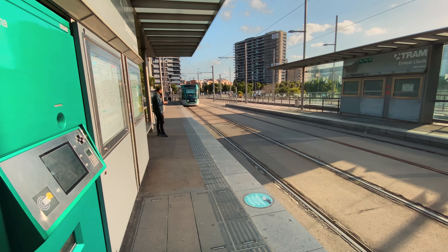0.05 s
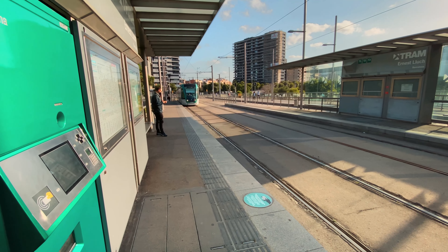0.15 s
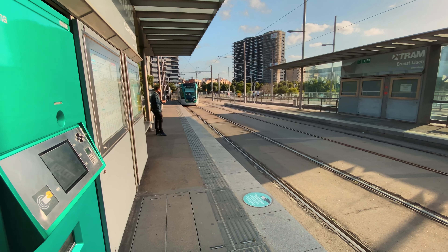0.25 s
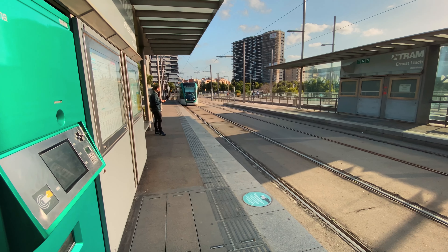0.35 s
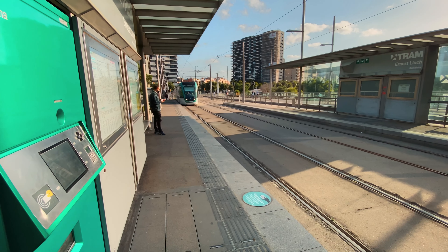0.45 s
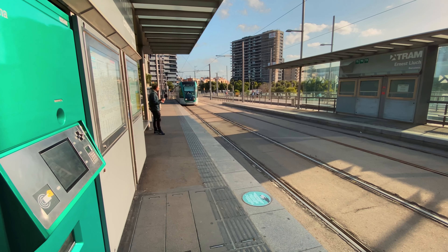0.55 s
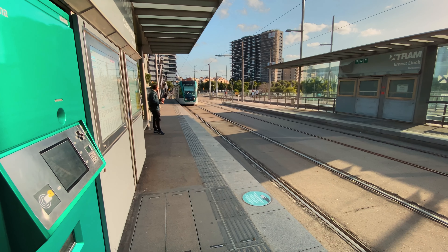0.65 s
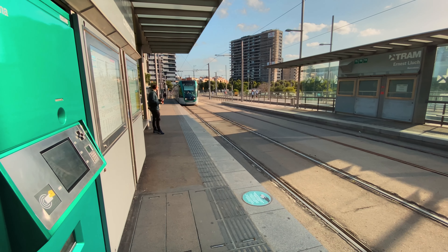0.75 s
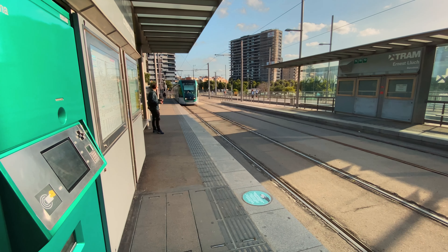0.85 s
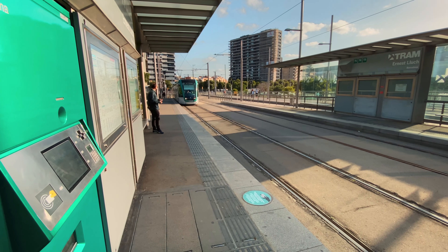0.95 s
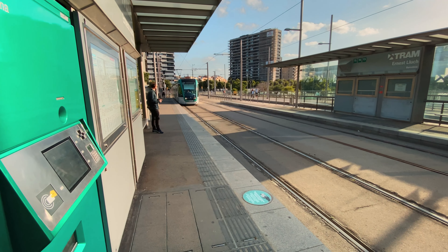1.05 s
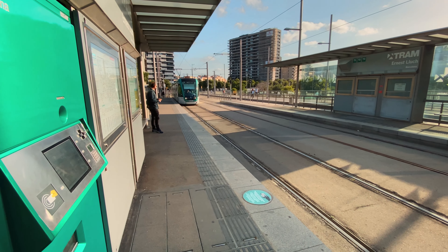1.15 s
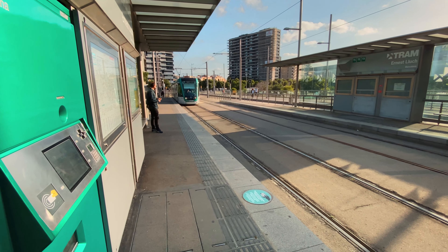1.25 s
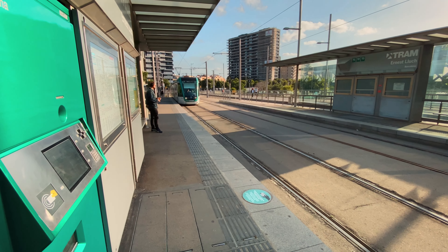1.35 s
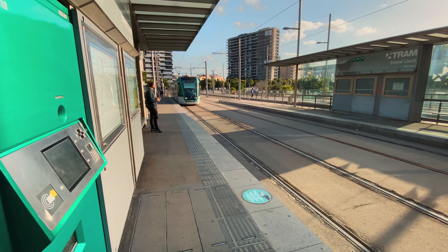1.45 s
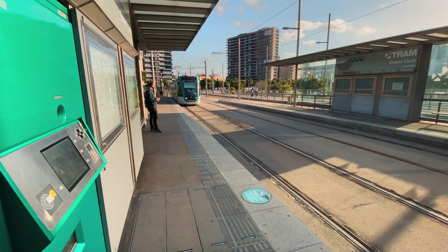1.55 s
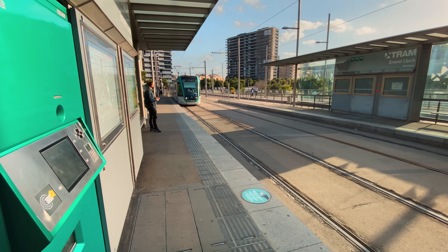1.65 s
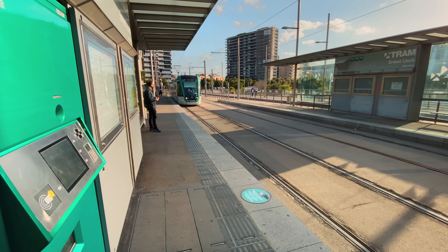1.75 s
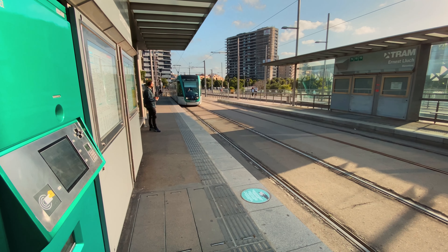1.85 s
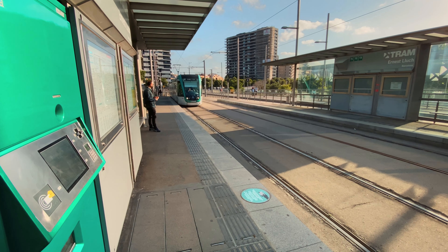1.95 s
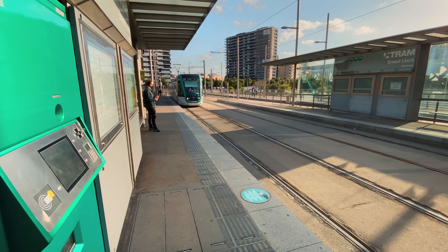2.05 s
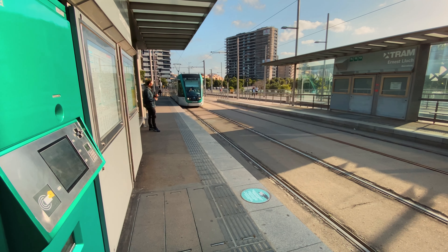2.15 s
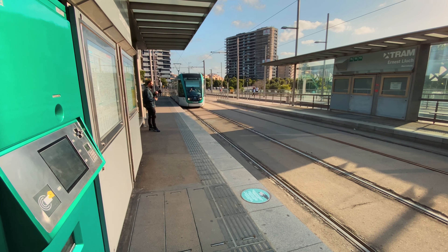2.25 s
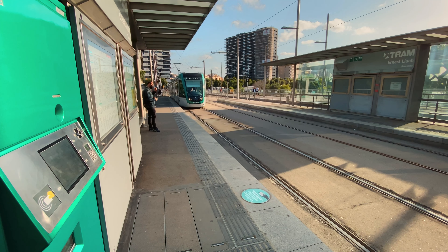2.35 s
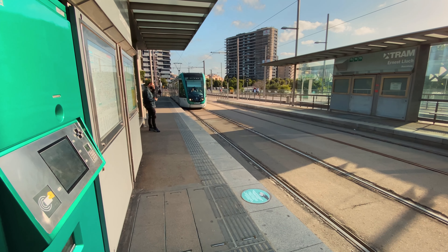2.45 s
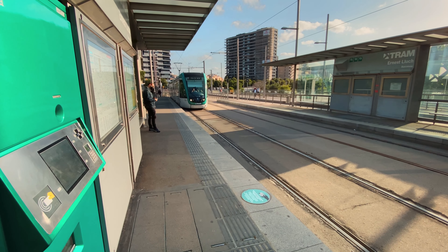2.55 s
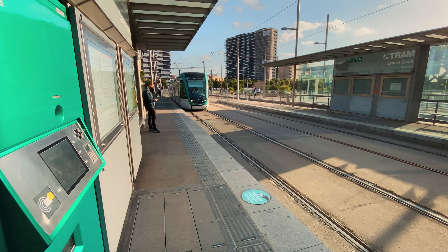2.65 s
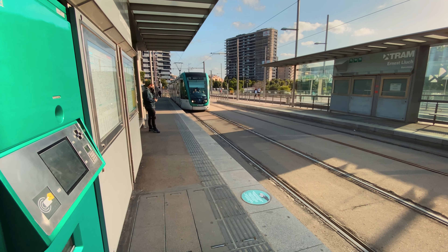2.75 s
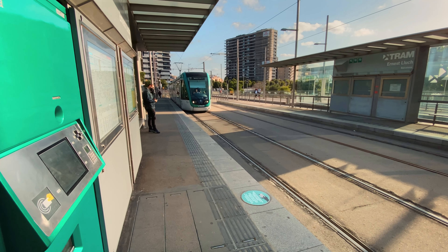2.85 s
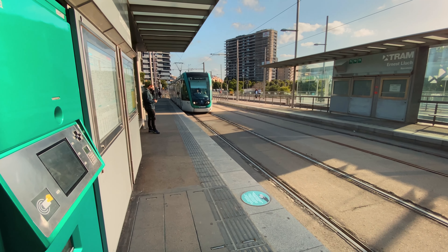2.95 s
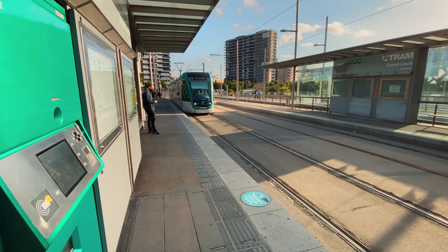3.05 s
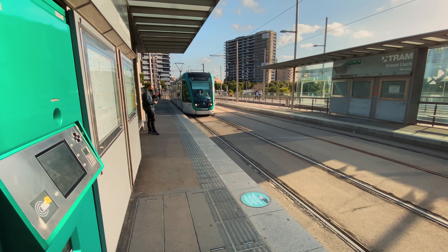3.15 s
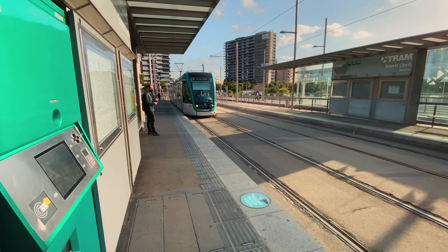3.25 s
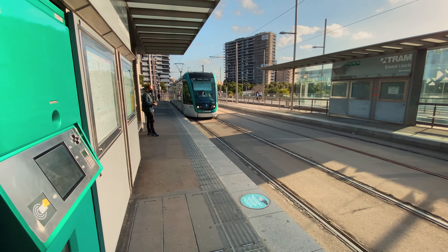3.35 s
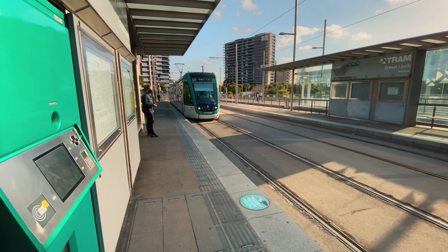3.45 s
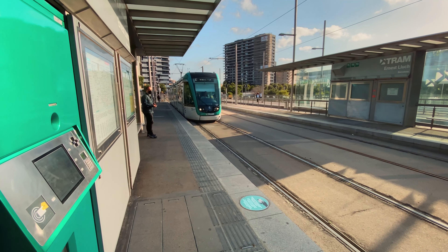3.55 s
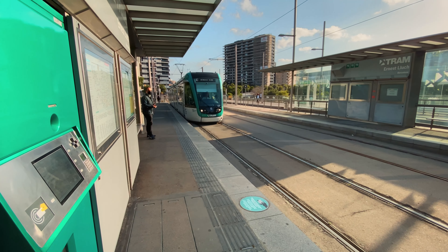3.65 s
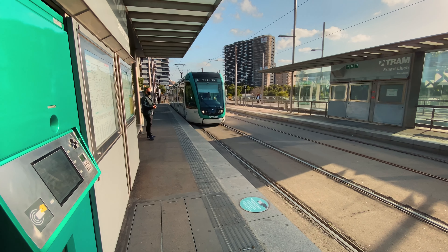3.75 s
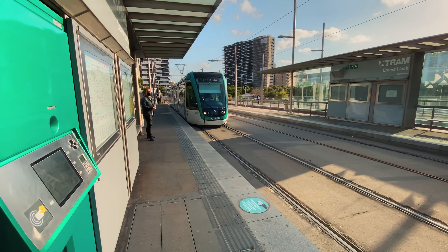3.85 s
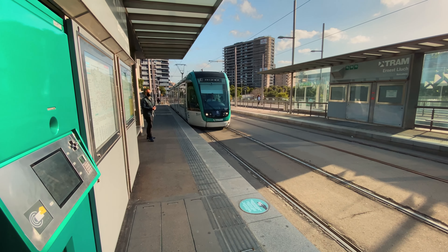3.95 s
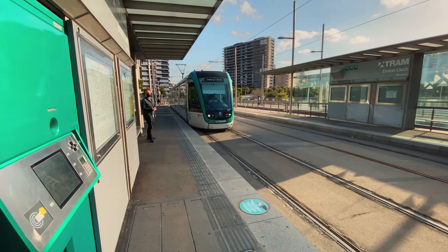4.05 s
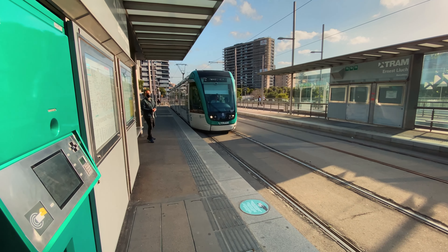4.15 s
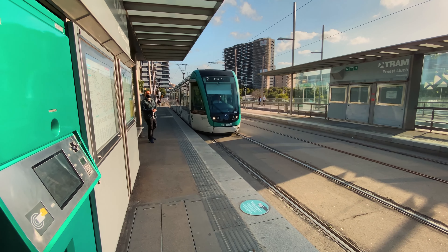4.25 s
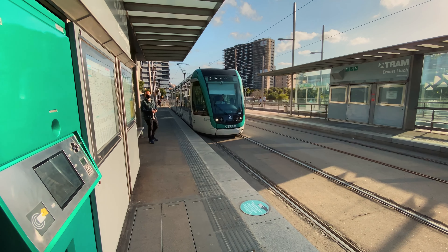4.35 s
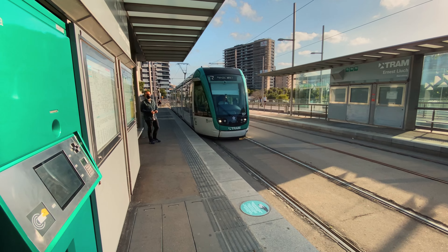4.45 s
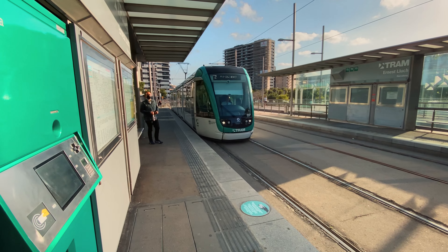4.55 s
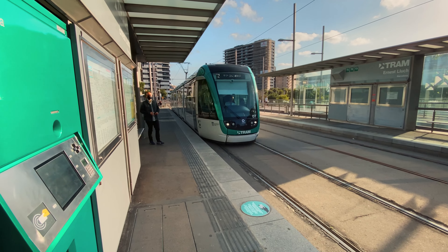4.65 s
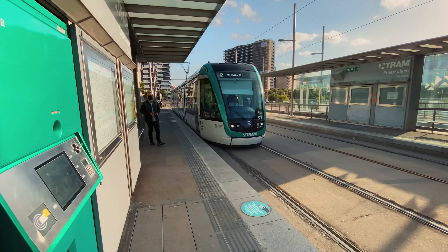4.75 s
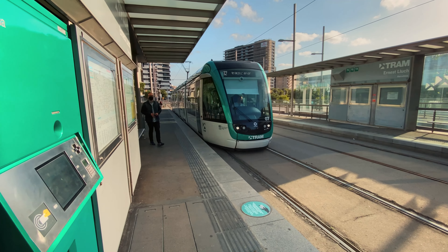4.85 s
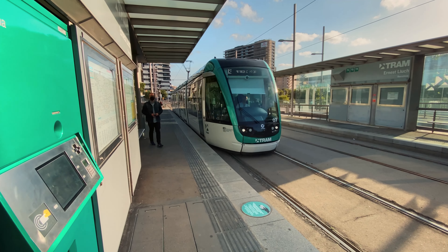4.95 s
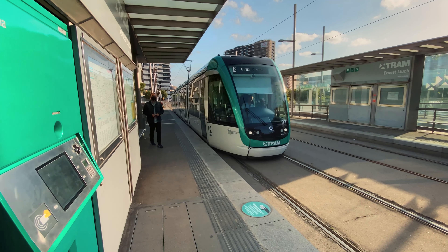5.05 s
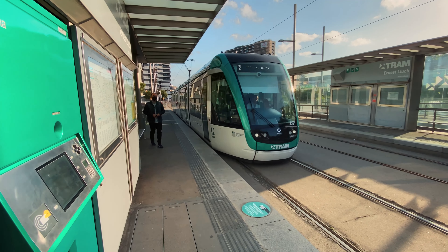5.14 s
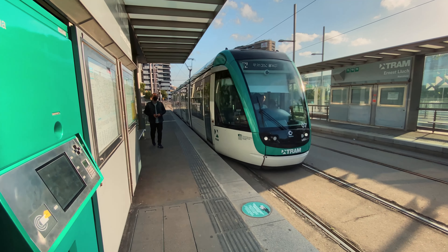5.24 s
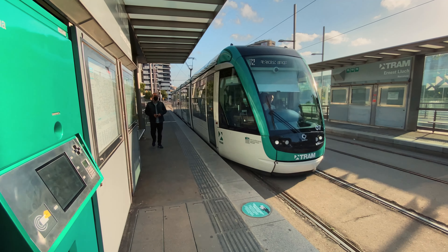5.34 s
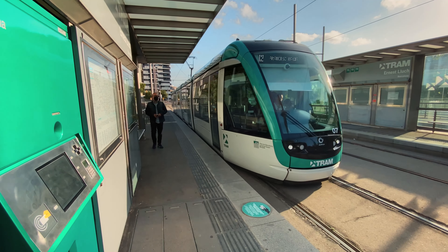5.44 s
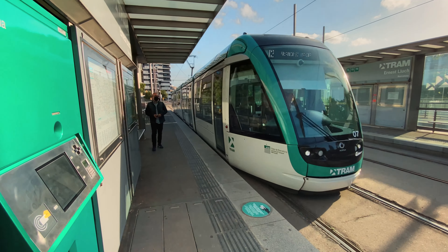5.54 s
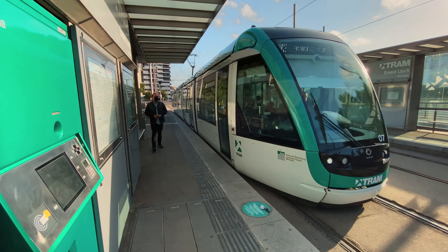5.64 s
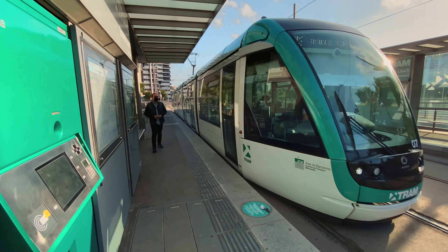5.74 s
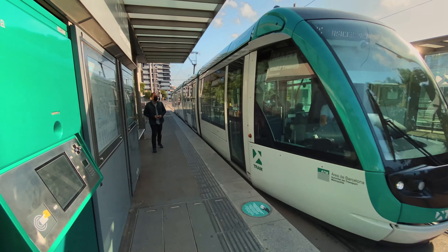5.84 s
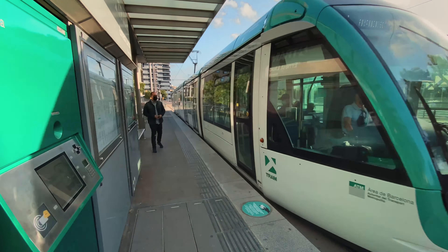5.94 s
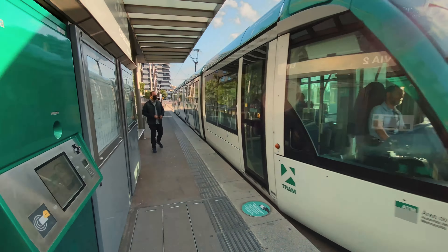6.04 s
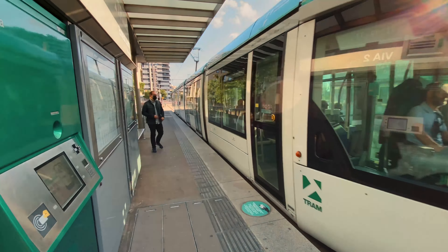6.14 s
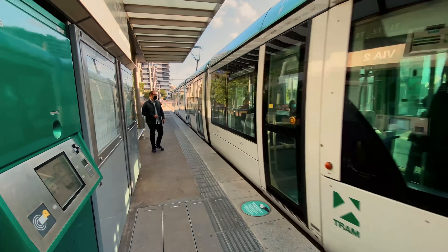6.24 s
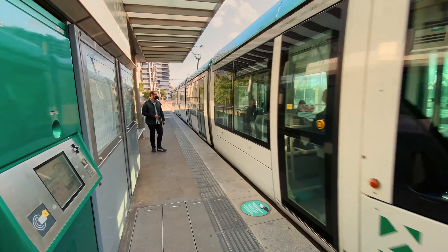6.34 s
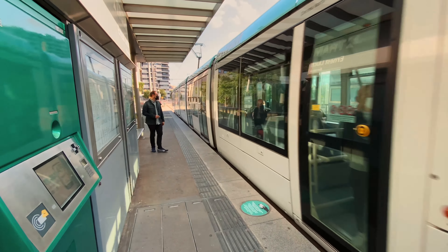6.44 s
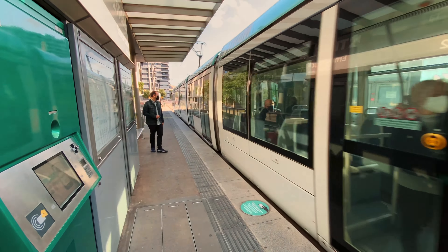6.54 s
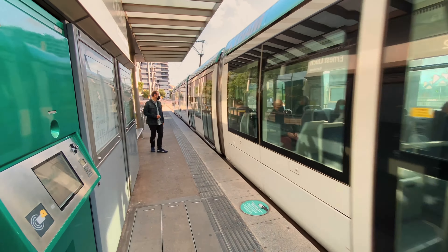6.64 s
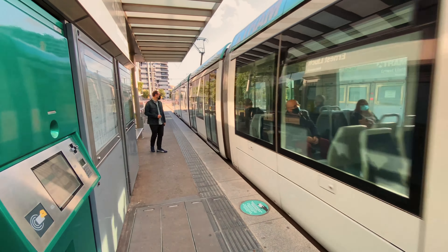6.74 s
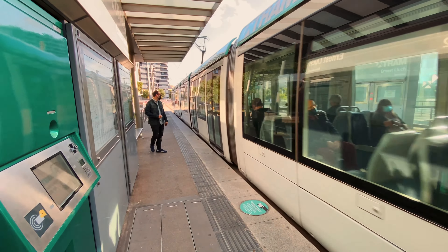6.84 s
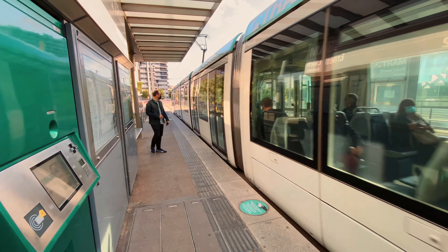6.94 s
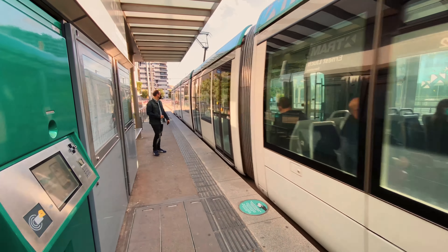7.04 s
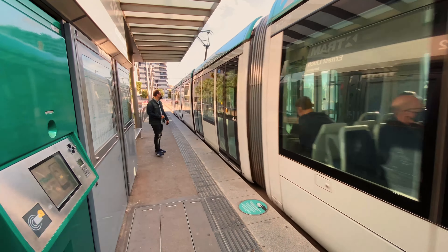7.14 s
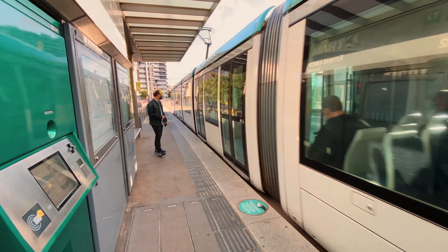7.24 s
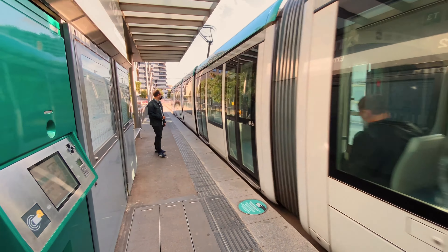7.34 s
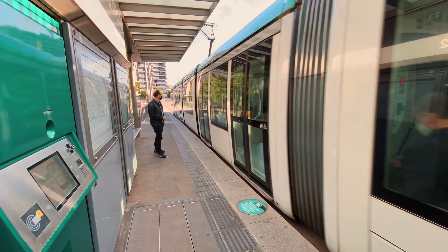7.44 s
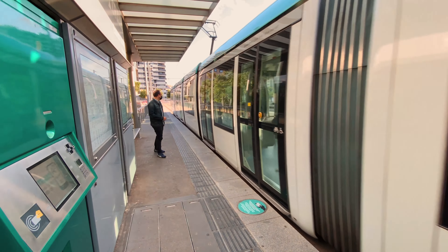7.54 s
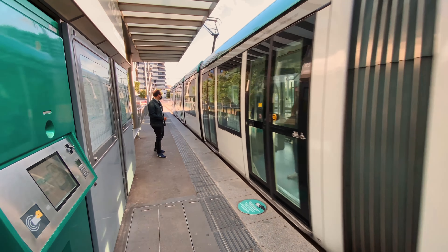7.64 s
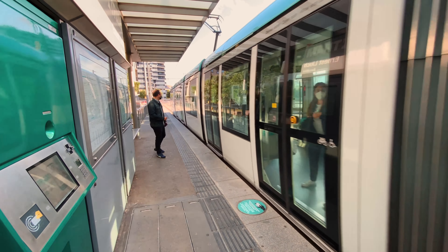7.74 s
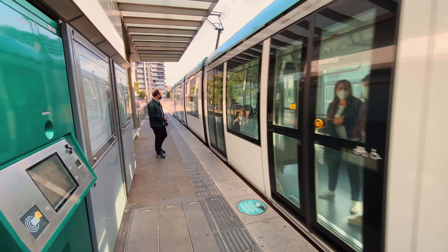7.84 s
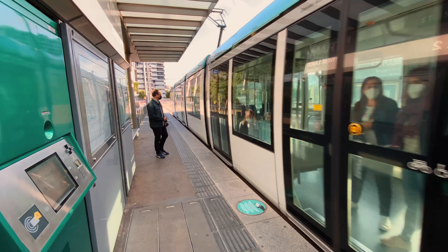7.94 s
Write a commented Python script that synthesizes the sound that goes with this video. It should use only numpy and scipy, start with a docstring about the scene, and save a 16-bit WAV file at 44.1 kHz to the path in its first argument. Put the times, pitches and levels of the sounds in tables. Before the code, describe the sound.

At an outdoor tram platform over a low city wash, a distant tram hums and whines thinly. Its rolling rumble swells steadily, gears wavering and slowly sinking in pitch, electric drives singing until they cut out around five seconds. It then passes close, wheels ringing with short scrapes, hissy rubbing and thin squeals; a quick rattle of knocks brings the electric singing back. Stereo microphones stand beside the track.

```python
"""An electric tram brakes into an open-air platform under a canopy. Its wheels rumble on the rails (shaped noise),
ring faintly, rub and squeal (noise in narrow resonances, clicks, a thin tone). Gears whine down in pitch and
two inverters sing (wavering tones); the inverters fall silent while it coasts and cut in again near the end.
Below lie a low hum (four tones) and far traffic (steady noise). A spaced pair of microphones hears the tram
from the left, then alongside."""
import sys
import numpy as np
from scipy import signal
from scipy.fft import rfft, irfft, next_fast_len
from scipy.io import wavfile
from scipy.ndimage import uniform_filter1d

SR = 44100
rng = np.random.default_rng(int(sys.argv[2]) if len(sys.argv) > 2 else 0)


def store_wav(level_fs):
    """Save 16-bit WAV to argv[1]."""
    pcm = np.round(np.clip(np.atleast_2d(level_fs), -1, 1) * 32767)
    wavfile.write(sys.argv[1], SR, pcm.T.astype(np.int16))


N = 352491
T = np.arange(N) / SR  # time of each sample, in seconds
SIZE = next_fast_len(N)
HZ = np.maximum(np.arange(SIZE // 2 + 1) * SR / SIZE, 1.0)  # frequency of each spectrum bin


def from_db(db):
    """Turn decibels into a gain."""
    return 10 ** (np.asarray(db) / 20)


def rms_one(x):
    """Scale a sound to an rms level of 1."""
    return x / np.sqrt(np.mean(x ** 2) + 1e-20)


def in_time(rows, outside=None):
    """Draw straight lines between table rows, giving each column a value at every sample."""
    seconds, *columns = np.transpose(rows)
    return [np.interp(T, seconds, column, outside, outside) for column in columns]


def at_hz(points):
    """Read a table of (Hz, value) at every bin, with straight lines over log frequency."""
    points = np.array(points)
    return np.interp(np.log(HZ), np.log(np.maximum(points[:, 0], 1)), points[:, 1])


def drift(rate):
    """A slow random curve with spread 1, making about `rate` changes a second."""
    knots = rng.standard_normal(int(N / SR * 60) + 3)  # 60 a second
    memory = np.exp(-np.clip(rate, .1, 60) / 20)
    smooth = signal.lfilter([1], [1, -memory], knots)
    return np.interp(T * 60, np.arange(len(knots)), rms_one(smooth))


def swells(times, levels_db, half_s):
    """Smooth swells (raised cosines) centred on the given times, each lasting twice half_s."""
    total = 0
    for seconds, db in zip(times, levels_db):
        position = np.clip((T - seconds) / half_s, -1, 1)
        total = total + from_db(db) * np.cos(np.pi / 2 * position) ** 2
    return total


# How much of a noise both microphones share.
# Each row: frequency in Hz, shared part of the power from 0 to 1.
SHARED_POWER = [(40, 0.96), (150, 0.9), (300, 0.85), (450, 0.39), (650, 0.05), (1200, 0.36), (2500, 0.15),
                (6000, 0.017), (9000, 0.068), (13000, 0.24)]


def stereo_noise(shape):
    """Three noise spectra of one shape: the part both sides share, then what left and right each hear alone."""
    alike = np.clip(at_hz(SHARED_POWER), 0, 1)
    white = rng.standard_normal((3, len(HZ))) + 1j * rng.standard_normal((3, len(HZ)))
    return white * shape * np.sqrt([alike, 1 - alike, 1 - alike])


def place(parts, lag):
    """Spread a sound over two microphones: its shared part reaches the right one `lag` samples later."""
    shared, left, right = parts
    delayed = np.interp(np.arange(N) - lag, np.arange(N), shared)
    return np.array([shared + left, delayed + right])


def resonant(modes):
    """Noise ringing in narrow resonances; its total power is the sum of the modes' powers."""
    power = 0
    for hz, width_hz, db in modes:
        bell = (1 + (2 * (HZ - hz) / width_hz) ** 2) ** 2
        power = power + from_db(db) ** 2 / width_hz / bell
    parts = irfft(stereo_noise(np.sqrt(power)), SIZE)[:, :N]
    present_rms = np.sqrt(np.sum(np.mean(parts ** 2, axis=1)))
    wanted_rms = np.sqrt(sum(from_db(db) ** 2 for _, _, db in modes))
    return parts / present_rms * wanted_rms


SIDES_SLIP_RADIANS = .4  # how strongly the two sides wander from a quarter cycle apart


def tone(hz, waver_db, rate, radians):
    """A tone of rms about 1; echoes off canopy and ground make its phase and each side's level waver."""
    phase = 2 * np.pi * np.cumsum(hz) / SR + radians * drift(rate) + rng.uniform(0, 2 * np.pi)
    sides = []
    for side in range(2):
        level = np.sqrt(2) * from_db(waver_db * drift(rate))
        offset = side * (np.pi / 2 + SIDES_SLIP_RADIANS * drift(rate))
        sides.append(level * np.sin(phase + offset))
    return np.array(sides)


# The loudest bogie (wheel truck) runs past the microphones.
SPEED_M_PER_S, TRACK_M, ABREAST_S = 4.6, 1.83, 7.35  # TRACK_M: distance to the side when abreast
END_ON_LAG_SAMPLES = 14.9  # the lag of the right side for sound from straight along the track


def bogie_lag():
    """Samples by which the right microphone hears the bogie later, from its bearing; negative once it is past."""
    ahead_m = SPEED_M_PER_S * (ABREAST_S - T)
    return END_ON_LAG_SAMPLES * ahead_m / np.hypot(ahead_m, TRACK_M)


# Rolling noise as the tram nears. Only the changes in middle and hiss around their average near the tram count.
# Each row: time in seconds, rumble level in dB, middle and hiss in dB relative to the rumble.
ROLLING_LEVELS = [(0, -41.5, -6, -28.5), (1.5, -41.5, -6.5, -30.5), (2, -38.5, -9.5, -30),
                  (2.5, -36, -6, -31.5), (2.9, -36, -8, -30.5), (3.15, -34.5, -10.5, -30.5),
                  (3.9, -33.5, -6, -29.5), (4.2, -30, -7, -32.5), (4.9, -29.5, -6.5, -29.5),
                  (5.45, -26.5, -5, -33), (6.2, -22.5, -9, -34), (6.65, -24, -6, -31),
                  (7.05, -24.5, -7, -29), (7.3, -23, -8.5, -30), (7.37, -23, -7, -27.5),
                  (8, -24.5, -4, -29)]
# Where rumble, middle and hiss hold sway. One row: the three frequencies in Hz.
ROLLING_ZONES_HZ = [350, 1000, 4000]
# Colour of the rolling noise. Each row: frequency in Hz, relative strength in dB per Hz.
RAIL_SPECTRUM = [(18, -52), (30, -20), (59, -9), (102, -6), (163, -1.5), (275, -1.5), (390, 0.5), (470, -7),
                 (800, -9.5), (1100, -14), (1580, -19), (2500, -24.5), (3300, -29.5), (6640, -34),
                 (7570, -40.5), (9820, -43.5), (11000, -48), (12000, -67), (13500, -48.5), (15300, -63)]
# Resonances that bend this colour, most of them the track's. Each row: frequency in Hz, width in Hz, height in
# dB.
ROLLING_PEAKS = [(178.7, 17, 8), (250, 25, 2), (365, 55, 2), (472, 11.3, 6), (657, 26, 3), (777, 48, -2),
                 (1085, 8.1, 4), (2500, 280, 4), (2240, 54, -0.5), (10080, 270, 7)]


def rolling():
    """Rough wheels on rough rails: noise in octave zones that changes colour and flickers as the tram nears."""
    rumble_db, middle_db, hiss_db = in_time(ROLLING_LEVELS)
    peaks_db = sum(db / (1 + (2 * (HZ - hz) / width) ** 2) for hz, width, db in ROLLING_PEAKS)
    spectra = stereo_noise(from_db(at_hz(RAIL_SPECTRUM) + peaks_db))
    # the rumble band sets the overall level
    rumble_band = (HZ > 110) & (HZ < 480)
    scale = np.sqrt(2 * np.sum(np.abs(spectra[:, rumble_band]) ** 2)) / SIZE
    near = (T > 5.2) & (T < 7.2)
    tilts_db = [0 * T, middle_db - middle_db[near].mean(), hiss_db - hiss_db[near].mean()]
    together = drift(10.0)
    out = 0
    for centre_hz in 90 * 2. ** np.arange(8):
        octaves = np.clip(np.log2(np.clip(HZ, 90, 11520) / centre_hz), -1, 1)
        zone = spectra * np.cos(octaves * np.pi / 2) ** 2
        shares = [np.interp(np.log(centre_hz), np.log(ROLLING_ZONES_HZ), only) for only in np.eye(3)]
        tilt_db = sum(share * tilt for share, tilt in zip(shares, tilts_db))
        flicker_db = .3 * together + .5 * drift(14.0) + .8 * drift(4.0)
        out = out + from_db(rumble_db + tilt_db + flicker_db) * irfft(zone, SIZE)[:, :N]
    return place(out / scale, bogie_lag())


# Ringing as the tram rolls; each resonance's own dB is added to these levels.
# Each row: time in seconds, low level in dB, high level in dB.
RINGING_LEVELS = [(0, -64, -90), (3.5, -60, -80), (4.3, -56, -70), (5, -51, -64), (5.3, -53, -62),
                  (5.6, -49, -60), (5.9, -46, -59), (6.7, -45, -54), (7.1, -47, -57), (7.4, -47, -48),
                  (8, -50, -49)]
# Low and high wheel modes, and fitful patches of ringing in wheels and rolling rumble, which follow the low level.
# Each row: frequency in Hz, width in Hz, level in dB.
LOW_MODES = [(1870, 70, -1), (1795, 50, -5)]
HIGH_MODES = [(5615, 130, -3), (6690, 120, -5), (5190, 100, -8), (5845, 80, -8), (6240, 200, -5)]
FITFUL_PATCHES = [(2415, 73, -10), (2714, 80, -11), (2260, 59, -11.5), (3190, 100, -14.5), (1535, 90, -16),
                  (1176, 53, -9), (1064, 72, -3.5), (832, 46, -11.5), (655, 36, 1), (504, 12, 1),
                  (389, 18, 5.5), (298.4, 16, 4), (220, 34, 4)]
# Short scrapes that jar the wheel. Each row: time in seconds, low modes in dB, fitful patches in dB.
SCRAPES = [(5.43, -53, -60), (5.54, -46, -56), (5.68, -53, -58), (5.73, -48, -56), (5.91, -44, -55),
           (5.99, -53, -59), (6.06, -57, -54), (6.22, -52, -52), (6.41, -45, -50), (6.52, -43, -40.5),
           (6.58, -44, -56), (6.63, -53, -49), (6.78, -55, -61), (6.87, -39, -53), (6.94, -44, -48),
           (7.06, -50, -45), (7.13, -43, -46), (7.22, -41, -55), (7.31, -46, -55)]
SCRAPE_HALF_S, SCRAPE_GRAIN_DB = .055, 2.0  # half the length of a scrape; graininess of the low modes
FIT_DB, FITS_PER_S = 3.8, 14


def ringing():
    """Rolling keeps wheel modes ringing, with fitful patches in wheels and rumble; short scrapes add bursts."""
    low, high = uniform_filter1d(from_db(in_time(RINGING_LEVELS, -200)), size=1000)
    times, low_db, fitful_db = np.transpose(SCRAPES)
    grain = from_db(SCRAPE_GRAIN_DB * drift(60.0))
    low_drive = (low + swells(times, low_db, SCRAPE_HALF_S)) * grain
    fitful_drive = low + swells(times, fitful_db, SCRAPE_HALF_S)
    parts = low_drive * resonant(LOW_MODES) + high * resonant(HIGH_MODES)
    for patch in FITFUL_PATCHES:
        fits = from_db(FIT_DB * drift(FITS_PER_S))
        parts += fitful_drive * fits * resonant([patch])
    return place(parts, bogie_lag())


# Something rubs twice each wheel turn; the hiss resonances' own dB is added.
# Each row: time in seconds, level in dB.
RUBS = [(4.75, -65), (4.95, -62), (5.14, -65), (5.32, -61), (5.5, -63), (5.69, -59), (5.88, -57),
        (6.09, -59), (6.26, -55), (6.5, -52), (6.67, -52), (6.9, -51), (7.1, -50), (7.35, -50), (7.55, -53),
        (7.8, -56), (7.99, -58)]
# Colour of the rub's hiss. Each row: frequency in Hz, width in Hz, level in dB.
RUB_HISS = [(9780, 170, -3), (10100, 170, -8), (9950, 900, -6)]
RUB_HALF_S = .14  # half the length of a rub


def rubs():
    """Rubbing: swells of high, slightly grainy hiss."""
    grain = from_db(1.5 * drift(30.0))
    hiss = swells(*np.transpose(RUBS), RUB_HALF_S) * grain * resonant(RUB_HISS)
    return place(hiss, bogie_lag())


# Pitch of a thin wheel squeal. Each row: time in seconds, frequency in Hz.
SQUEAL_PITCH = [(0, 8220), (5, 8200), (6.3, 8195), (7, 8175), (8, 8140)]
# Its bursts, all lifted by 2.5 dB when played. Each row: time in seconds, level in dB before the lift.
SQUEAL_BURSTS = [(4.0, -83), (4.08, -77), (4.42, -80), (5.13, -72), (5.18, -77), (5.31, -72), (5.51, -73),
                 (5.54, -67), (5.58, -73), (5.86, -67), (6.07, -72), (6.13, -58), (6.15, -64), (6.26, -61),
                 (6.35, -72), (6.39, -57), (6.42, -70), (6.5, -70), (6.58, -59), (6.61, -61), (6.8, -65),
                 (6.88, -72), (6.92, -53), (6.96, -63), (7.06, -55), (7.12, -66), (7.15, -57), (7.2, -67),
                 (7.26, -57), (7.32, -70), (7.35, -50), (7.39, -60), (7.57, -59), (7.6, -53), (7.64, -59),
                 (7.77, -56), (7.8, -61), (7.84, -54), (7.9, -58), (7.99, -56)]


def squeal():
    """A thin, restless wheel squeal: one high tone that comes in bursts."""
    level = from_db(in_time(SQUEAL_BURSTS)[0] + 2.5)
    return level * tone(in_time(SQUEAL_PITCH)[0], 3.0, 40.0, 1.5)


# Knocks as the drives take load; each varies by chance. Each row: time in seconds, level in dB.
KNOCKS = [(7.318, -38), (7.326, -35), (7.333, -31), (7.343, -35), (7.354, -32), (7.361, -33), (7.369, -35),
          (7.378, -35)]
# Modes of the bogie. Each row: frequency in Hz, level in dB, seconds to die away by 60 dB.
BOGIE_MODES = [(520, 1, .06), (850, 0, .05), (1010, -3, .05), (1180, -1, .065), (1250, -1, .06),
               (1780, -5, .06), (1870, -3, .07), (2100, -6, .07), (2270, -11, .05), (2480, -11, .05),
               (2770, -12, .05)]


def knocks():
    """Each knock rings the modes of the bogie, every mode with a strength and sign of its own."""
    times, levels_db = np.transpose(KNOCKS)
    total = np.zeros(N)
    for hz, mode_db, decay_s in BOGIE_MODES:
        clicks = np.full(N, 1e-18)
        strengths = from_db(levels_db + mode_db + rng.normal(0, 3, len(times)))
        clicks[(times * SR).astype(int)] = strengths * rng.choice([-1, 1], len(times))
        shrink = from_db(-60 / (decay_s * SR))  # per sample
        turn = 2 * np.pi * hz / SR  # radians per sample
        total += signal.lfilter([0, np.sin(turn)], [1, -2 * shrink * np.cos(turn), shrink ** 2], clicks)
    return place([total, 0, 0], bogie_lag())


# Gear teeth meshing. Each row: time in seconds, frequency in Hz, level in dB.
GEAR_MESH = [(0, 378, -52), (.6, 375, -48), (1, 372.6, -43), (1.15, 372, -54), (1.6, 369.5, -58),
             (2.6, 362, -46), (2.9, 361, -41), (3.12, 360, -47), (3.25, 360, -38), (3.5, 359, -37),
             (3.9, 357, -31.5), (4.03, 356, -33), (4.08, 356, -48), (4.25, 356, -36), (4.35, 356, -50),
             (4.55, 362, -50), (4.62, 366, -30), (4.85, 364, -33), (4.93, 362, -46), (5.1, 361, -34),
             (5.3, 358, -39), (6, 356.8, -35.5), (6.6, 355.5, -48), (6.93, 357, -29), (7.02, 357, -42),
             (7.3, 359, -39), (7.55, 362, -30), (7.7, 361, -40), (8, 359.6, -35)]
# Its overtones. Each row: time in seconds, second harmonic in dB, third harmonic in dB.
GEAR_OVERTONES = [(0, -57, -72), (.8, -58, -70), (1.2, -50, -70), (1.6, -54, -68), (2.2, -55, -60),
                  (2.7, -54, -51), (2.95, -58, -62), (3.15, -46, -58), (3.4, -48, -62), (3.7, -56, -62),
                  (3.9, -50, -52), (4.1, -47, -54), (4.3, -49, -52), (4.6, -54, -66), (7.4, -65, -65),
                  (7.9, -54, -44)]
# Faint fourth and sixth harmonics, heard from afar. Each row: time in seconds, level of each in dB.
GEAR_UPPER = [(0, -76), (1, -67), (1.6, -70), (2.4, -65), (2.9, -72), (3.8, -72), (4.4, -78), (4.6, -90)]


def gears():
    """Meshing teeth give a whine at the rate they meet, with tones at multiples of that rate."""
    mesh_hz, mesh_db = in_time(GEAR_MESH)
    phase = 2 * np.pi * np.cumsum(mesh_hz) / SR + 0.5 * drift(13.6)
    mesh = from_db(mesh_db) * np.sqrt(2) * np.sin(phase)
    out = place([mesh, 0, 0], bogie_lag())
    for multiple, level in zip((2, 3), from_db(in_time(GEAR_OVERTONES))):
        out = out + level * tone(multiple * mesh_hz, 1.4, 6.0, 0.35)
    upper = from_db(in_time(GEAR_UPPER)[0])
    for multiple in (4, 6):
        out = out + upper * tone(multiple * mesh_hz, 3.5, 6.0, 0.8)
    return out


# Separate whines, from gears or ringing wheels, that sink in pitch.
# Each row: start, loudest moment and end in seconds, first and last pitch in Hz.
WHINES = [(2.85, 3.0, 3.2, 880, 876), (3.2, 3.47, 3.65, 874, 870), (4.05, 4.2, 4.5, 860, 855),
          (3.7, 4.5, 5.3, 2160, 2066), (-1.0, 0.1, 1.9, 1954, 1953), (6.7, 7.5, 7.9, 833, 828),
          (6.5, 7.7, 8.6, 2720, 2706), (.2, .42, .6, 912, 908), (1.0, 1.45, 1.8, 468, 464),
          (3.7, 4.2, 5.0, 2860, 2800), (7.3, 7.55, 8.2, 1825, 1795), (7.4, 7.6, 7.95, 292, 285)]
# One level for each whine in the same order: dB at its loudest.
WHINES_DB = [-49, -46, -49, -54, -62, -38, -58, -55, -49, -62, -43, -30]


def whines():
    """Separate whines, from gears or ringing wheels: tones that swell and fade while sinking in pitch."""
    out = 0
    for (start, loudest, end, first_hz, last_hz), db in zip(WHINES, WHINES_DB):
        swell = np.sin(np.pi / 2 * np.interp(T, [start, loudest, end], [0, 1, 0]))
        pitch_hz = np.interp(T, [start, end], [first_hz, last_hz])
        out = out + from_db(db) * swell * tone(pitch_hz, 2.0, 8.0, 0.6)
    return out


# The inverters as heard. Each row: time in seconds, near and far drive switching in Hz, motor current in Hz,
# phase waver in radians at the third multiple, far drive level in dB relative to the near one.
SWITCHING = [(0, 1268, 1267.8, 40, .5, -14), (2.3, 1267.5, 1267.3, 39.3, .4, -14),
             (2.6, 1267, 1262, 39, .8, -9), (5.1, 1266.5, 1259, 37, 1.3, -3),
             (7.3, 1257, 1246, 33.5, 2.4, -4), (8, 1254, 1243, 32, 2.4, -4)]
# Two stretches in which the drives run; a floor and each tone's own dB are added to these levels.
# Each row: time in seconds, then in dB the tones above the third multiple, those below it, the second multiple.
DRIVE_LEVELS = [
    [(0.0, -81, -71, -74), (0.03, -70, -67, -78), (0.18, -78, -80, -86), (0.25, -65, -85, -67),
     (0.3, -62, -71, -78), (0.34, -65, -82, -60), (0.45, -62, -70, -69), (0.49, -64, -84, -68),
     (0.73, -60, -74, -59), (0.78, -75, -80, -59), (0.86, -57, -76, -53), (0.92, -87, -82, -73),
     (1.06, -75, -83, -76), (1.12, -55, -69, -78), (1.14, -81, -80, -62), (1.18, -67, -66, -56),
     (1.3, -81, -78, -79), (1.34, -64, -67, -75), (1.43, -79, -80, -58), (1.59, -60, -70, -67),
     (1.62, -81, -68, -61), (1.71, -57, -71, -79), (1.75, -61, -66, -63), (1.81, -71, -83, -83),
     (1.86, -54, -65, -70), (1.89, -69, -69, -79), (1.91, -61, -68, -62), (1.98, -55.5, -74, -56),
     (2.32, -50, -72, -70), (2.33, -52, -73, -55), (2.64, -64, -57, -57.5), (3.36, -56, -61, -60.5),
     (3.45, -49.5, -69, -52), (3.59, -58, -58, -72), (3.6, -53, -65, -66), (3.81, -59, -58, -59),
     (3.83, -54, -60, -67), (3.94, -60, -57, -50), (4.15, -52, -55, -53), (4.35, -56.5, -55.5, -52),
     (4.8, -51, -57, -54), (4.83, -61, -59, -48), (4.91, -51, -59, -57), (4.96, -60, -62, -62),
     (5.01, -47, -56, -46), (5.07, -55, -62, -60)],
    [(7.36, -54, -55, -51), (7.378, -47, -54, -48), (7.4, -44, -56, -48), (7.426, -57, -52, -41),
     (7.454, -43, -51, -40), (7.502, -43, -50, -48), (7.56, -49, -47, -40.5), (7.602, -49, -52, -50),
     (7.626, -41, -51, -52), (7.674, -45, -56, -50), (7.702, -43, -54, -55), (7.726, -53, -56, -54),
     (7.752, -42, -51, -50), (7.802, -47, -52, -51), (7.848, -40.5, -52, -50), (7.878, -59, -54, -49),
     (7.934, -50, -47, -54), (7.956, -54, -50, -60), (7.993, -49, -53, -54)],
]
# The upper multiples are faint at first, and strong but fluttering near the end; each tone's own dB is added.
# Each row: time in seconds, fourth and seventh multiples in dB, sixth and eighth multiples in dB.
UPPER_LEVELS = [(0, -79, -82), (2.5, -73, -76), (3, -69, -91), (5.07, -64, -85), (7.3, -53, -60),
                (7.42, -58, -57), (7.47, -44, -60), (7.54, -57, -57), (7.62, -45, -52), (7.67, -59, -55),
                (7.71, -39.5, -59), (7.75, -54, -59), (7.81, -44, -61), (7.9, -53, -55), (8, -51, -54)]
# The drive tones. Each row: multiple of switching, multiple of motor current, number of its level column
# (0 to 2 from the running stretches, 3 and 4 from the upper multiples).
DRIVE_TONES = [(3, 3, 0), (3, -3, 1), (3, 1, 0), (3, -1, 1), (3, 5, 0), (3, -5, 1), (2, 0, 2), (4, 0, 3),
               (4, 2, 3), (4, -2, 3), (6, 0, 4), (8, -2, 4), (8, 2, 4), (7, 1, 3)]
# One level for each drive tone in the same order: dB on top of its column.
DRIVE_TONES_DB = [2.5, 0, -11, -5, -15, -6, 2.5, 1, -1, -5, -1, -15, -12, -16]
UPPER_LEAD_S = .045  # the upper multiples cut in first
DRIVE_FLOOR_DB = -74  # added to the lower groups' levels while a drive runs
DRIVE_WAVER_DB, DRIVE_WAVERS_PER_S = 2.5, 20.0


def drives():
    """Pulse-width switching in two bogies: tones at multiples of the carrier, split by the motor current.
    Higher multiples waver more in phase, as each motor moves at its own angle."""
    near_hz, far_hz, motor_hz, radians, far_db = in_time(SWITCHING)
    lower, running = 0, 0
    for span in DRIVE_LEVELS:
        lower = lower + uniform_filter1d(from_db(in_time(span, -200)), size=300)
        running = running + 1. * ((T >= span[0][0] - UPPER_LEAD_S) & (T <= span[-1][0]))
    lower = np.where(lower > from_db(-100), lower + from_db(DRIVE_FLOOR_DB), lower)
    upper = uniform_filter1d(running, size=300) * from_db(in_time(UPPER_LEVELS))
    levels = [*lower, *upper]
    out = 0
    for (carrier, side, group), db in zip(DRIVE_TONES, DRIVE_TONES_DB):
        for switching_hz, drive_db in ((near_hz, 0), (far_hz, far_db)):
            hz = carrier * switching_hz + side * motor_hz
            sound = tone(hz, DRIVE_WAVER_DB, DRIVE_WAVERS_PER_S, radians * carrier / 3)
            out = out + from_db(db + drive_db) * levels[group] * sound
    return out


# Pitches of the low hum. One row: four frequencies in Hz.
HUM_HZ = [52.5, 80, 160.5, 226]
# Levels of these tones. Each row: time in seconds, then the level of each tone in dB, in the same order.
HUM_LEVELS = [(0, -45, -43, -53, -42.5), (1, -44.5, -46.5, -43, -57.5), (2, -48, -43, -47, -44),
              (3, -54, -44, -44.5, -51), (4, -39.5, -42, -39.5, -53), (4.9, -42.5, -46, -46.5, -34.5),
              (5.4, -43, -43, -31, -37), (5.9, -33, -52, -39, -34), (6.301, -38, -38, -31, -36),
              (6.8, -33, -40, -31.5, -44), (7.05, -42, -38.5, -34, -55), (7.4, -34.5, -34, -25.5, -52),
              (8, -46, -58, -26.5, -56)]
HUM_WAVER_DB, HUM_WAVERS_PER_S, HUM_WAVER_RADIANS = 2.1, 6.0, .45


def hum():
    """Low tones, alike on both sides, whose level and phase waver gently."""
    total = 0
    for hz, level in zip(HUM_HZ, from_db(in_time(HUM_LEVELS))):
        total = total + level * tone(np.full(N, hz), HUM_WAVER_DB, HUM_WAVERS_PER_S, HUM_WAVER_RADIANS)[0]
    return total * np.ones((2, 1))


# Colour of the far traffic. Each row: frequency in Hz, relative strength in dB per Hz.
TRAFFIC_SPECTRUM = [(15, -44), (25, -8), (54, 1), (129, 0.5), (159, -4.5), (232, -2), (258, -19),
                    (376, -19), (519, -44), (756, -14), (1480, -24.5), (3890, -30.5), (15300, -93)]
TRAFFIC_DB = -38.5  # overall rms level


def traffic():
    """The steady wash of the city: shaped noise whose shared part arrives 7.8 samples later on the right."""
    parts = irfft(stereo_noise(from_db(at_hz(TRAFFIC_SPECTRUM))), SIZE)[:, :N]
    return from_db(TRAFFIC_DB) * rms_one(place(parts, 7.8))


def scene():
    """All sources at the two microphones, added up."""
    tram = rolling() + ringing() + rubs() + squeal() + knocks() + gears() + whines() + drives()
    return tram + hum() + traffic()


# How the two microphones differ in colour. Each row: frequency in Hz, left over right in dB.
MICROPHONE_BALANCE = [(60, 1), (110, 0.5), (200, 0.5), (380, -0.5), (700, 5.5), (1290, 2), (2380, -1.5),
                      (4390, 2), (8110, 0.5), (15000, -2)]
CUTOFF_HZ = 15150


def record(dry):
    """The two microphones colour the sound differently, and a steep low-pass filter cuts the top."""
    half_db = at_hz(MICROPHONE_BALANCE) / 2
    coloured = irfft(rfft(dry, SIZE) * from_db([half_db, -half_db]), SIZE)[:, :N]
    low_pass = signal.ellip(12, .5, 70, CUTOFF_HZ, fs=SR, output="sos")
    return signal.sosfilt(low_pass, coloured)


dry = scene()
out = record(dry)
store_wav(out)
```